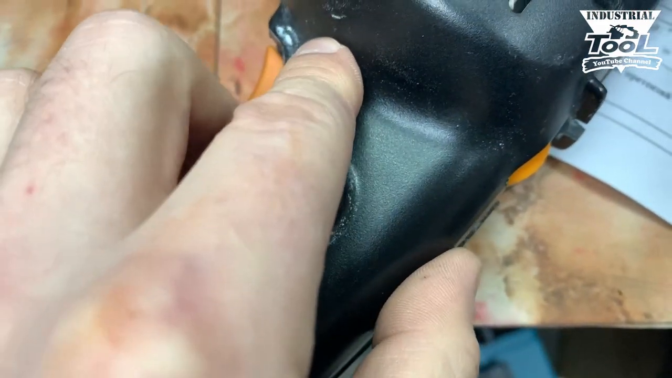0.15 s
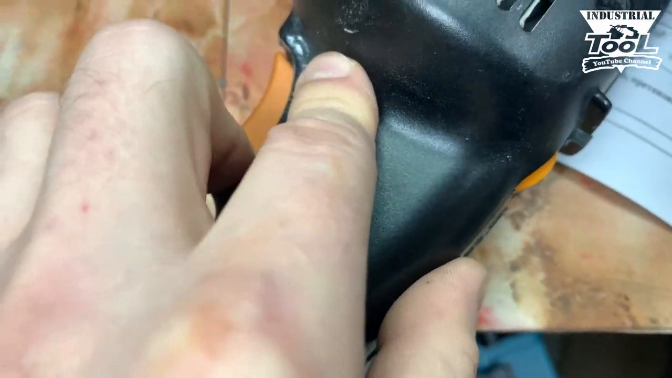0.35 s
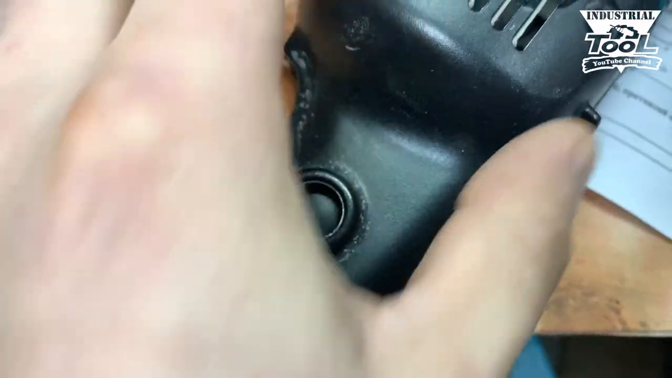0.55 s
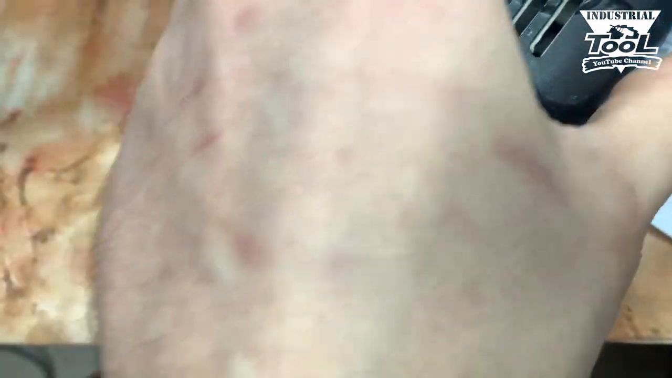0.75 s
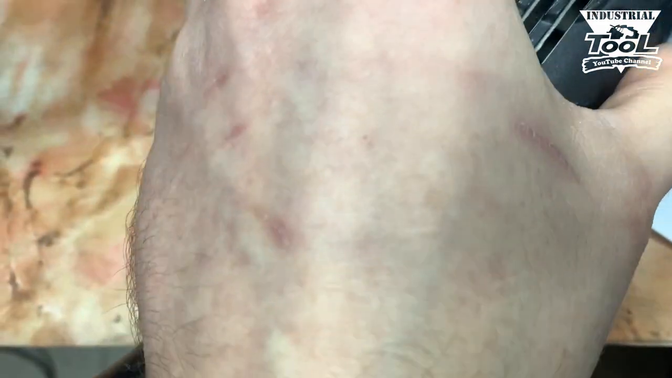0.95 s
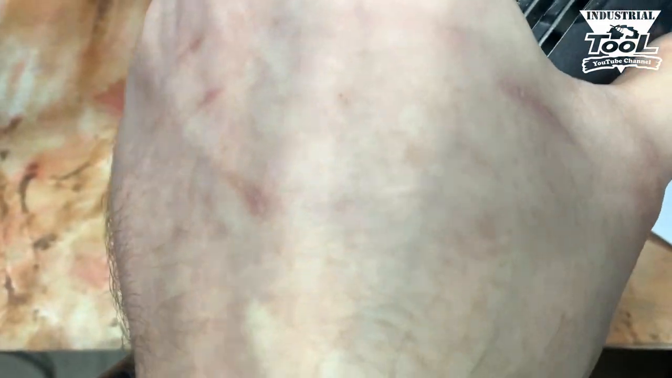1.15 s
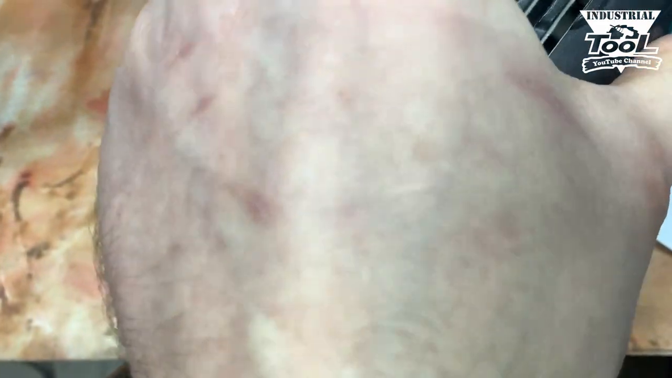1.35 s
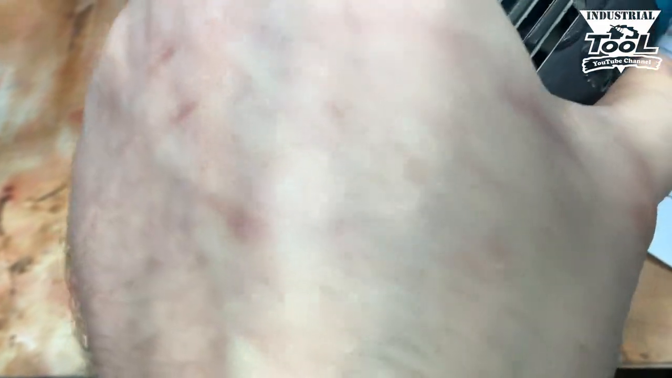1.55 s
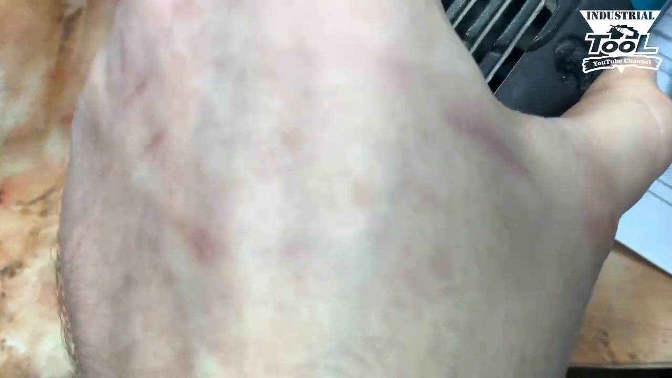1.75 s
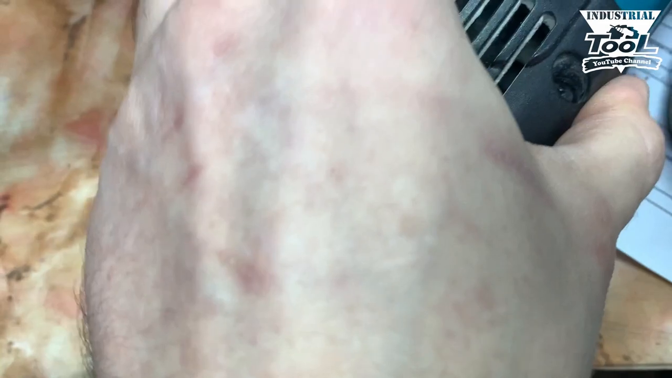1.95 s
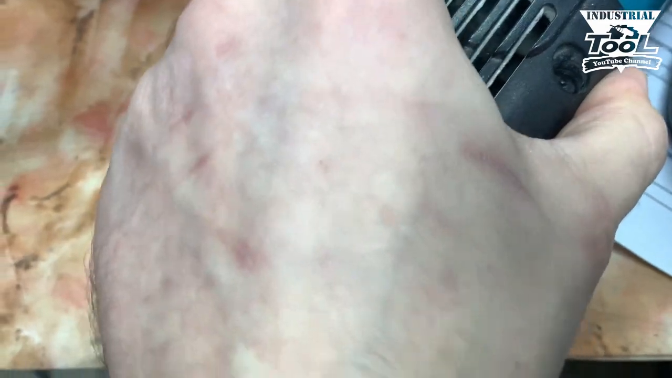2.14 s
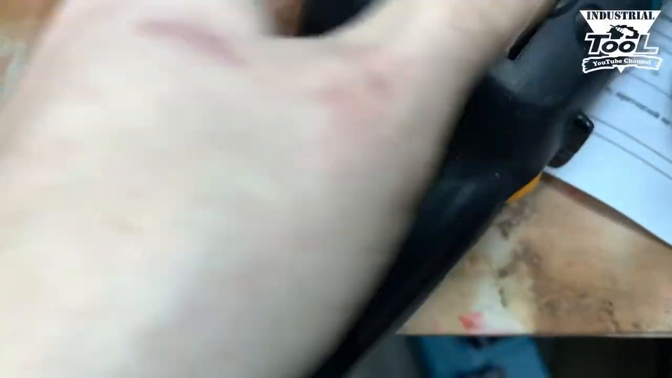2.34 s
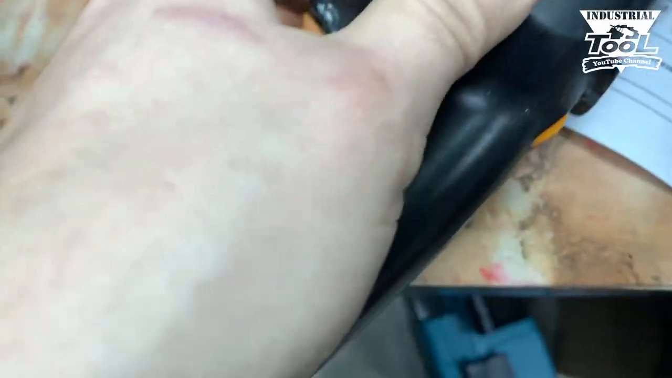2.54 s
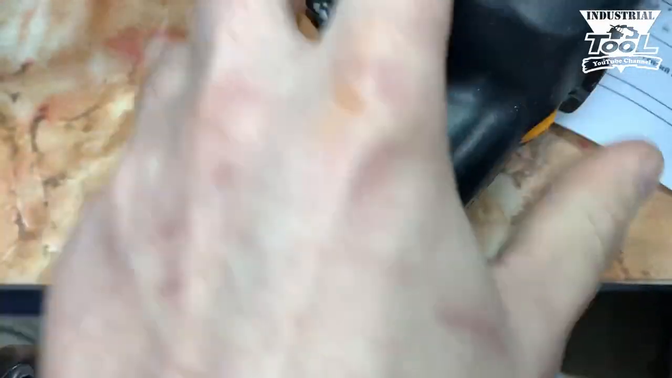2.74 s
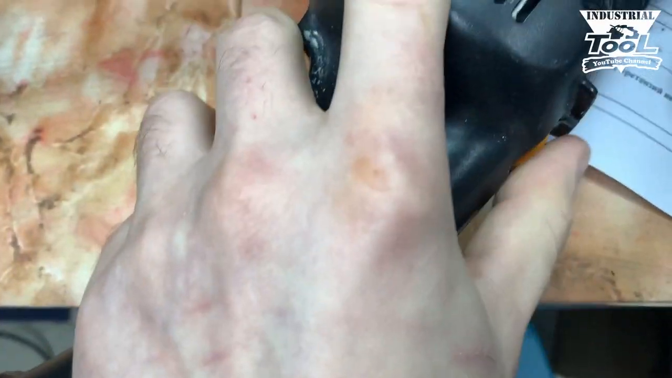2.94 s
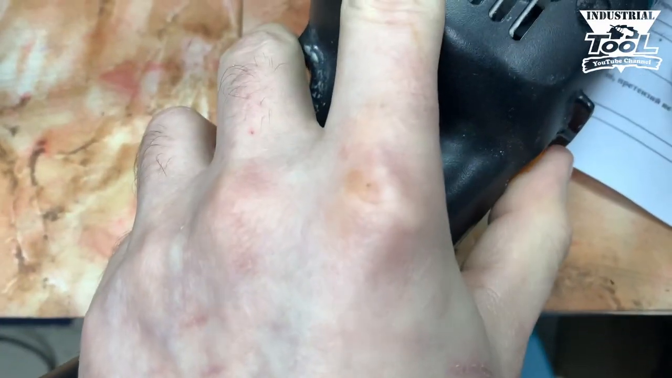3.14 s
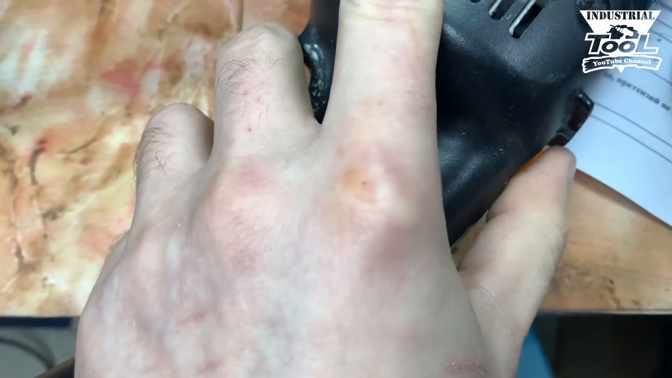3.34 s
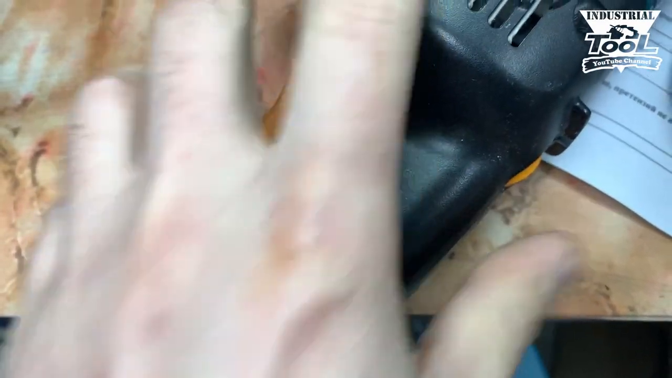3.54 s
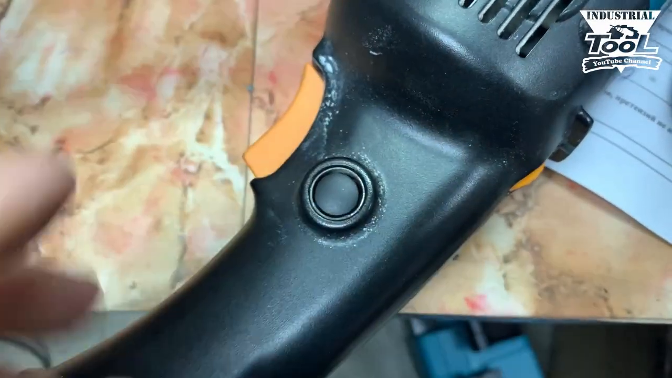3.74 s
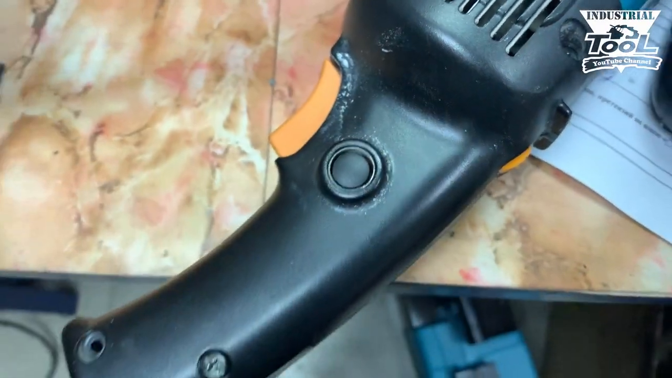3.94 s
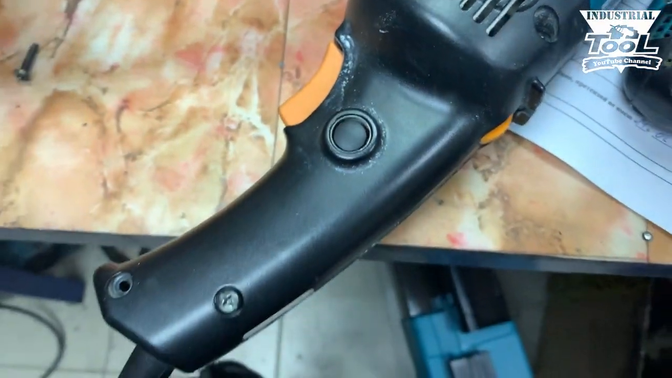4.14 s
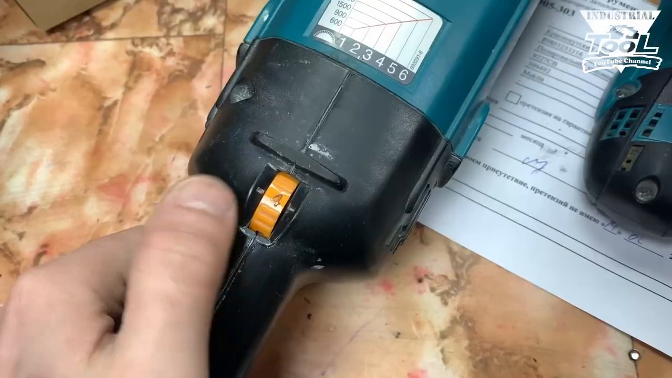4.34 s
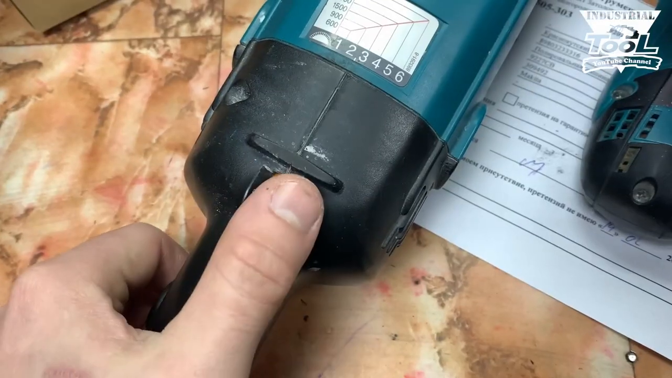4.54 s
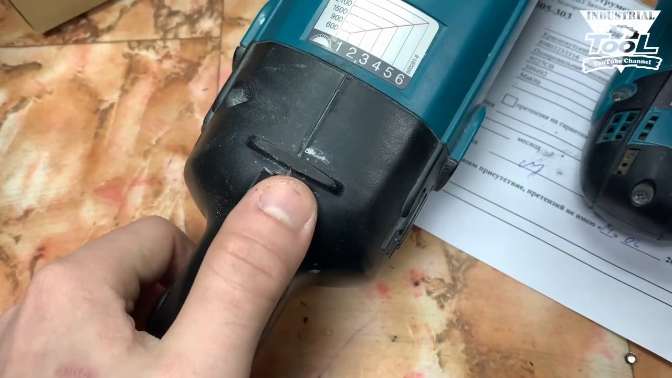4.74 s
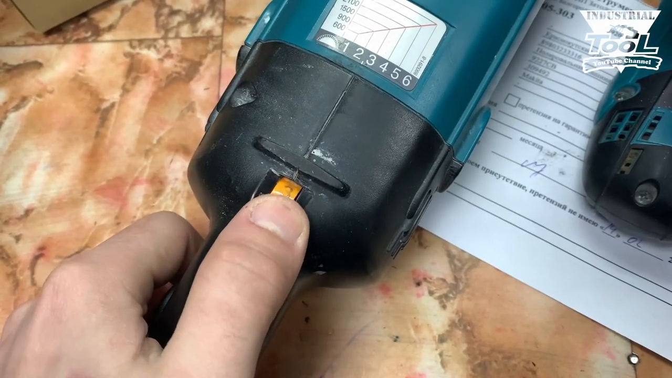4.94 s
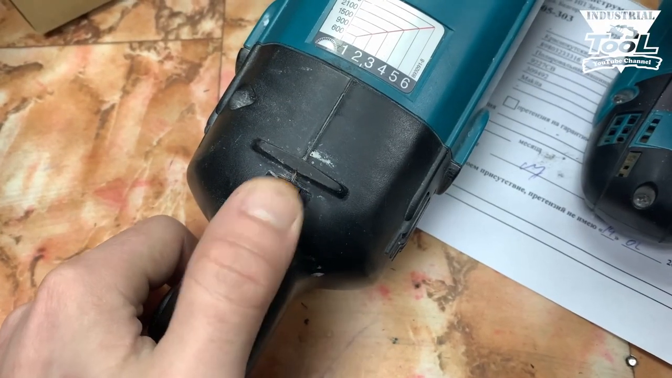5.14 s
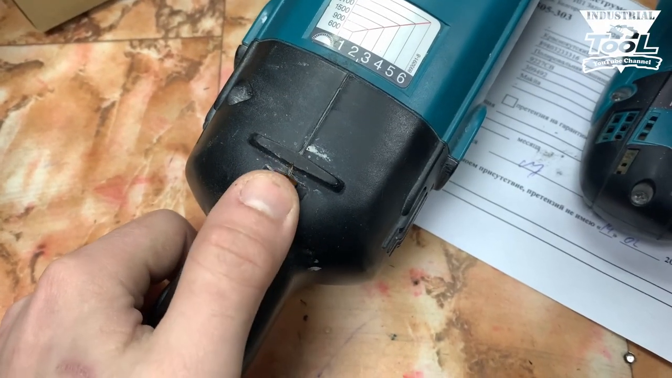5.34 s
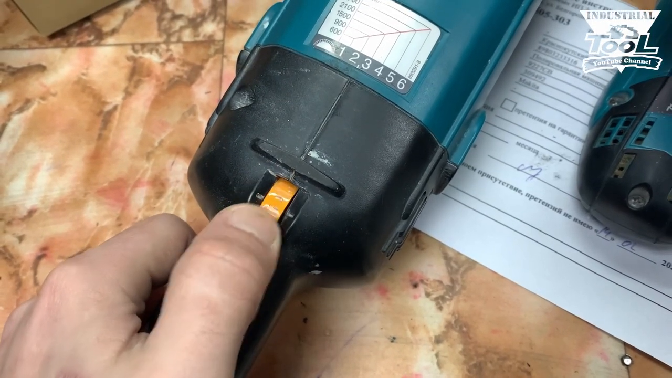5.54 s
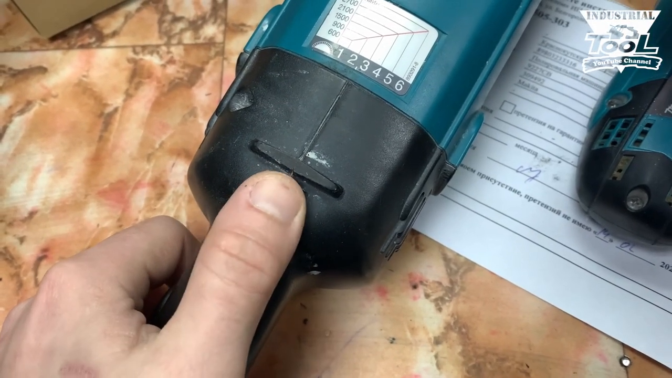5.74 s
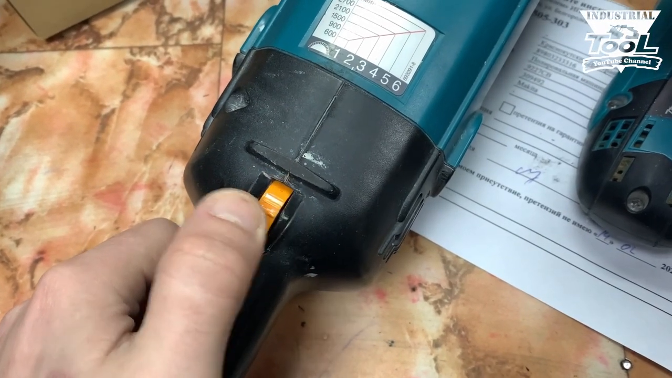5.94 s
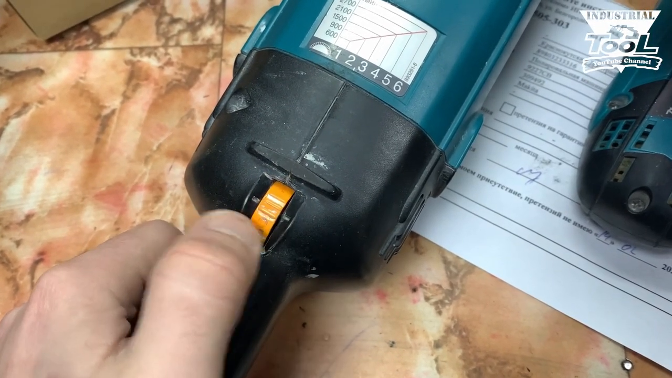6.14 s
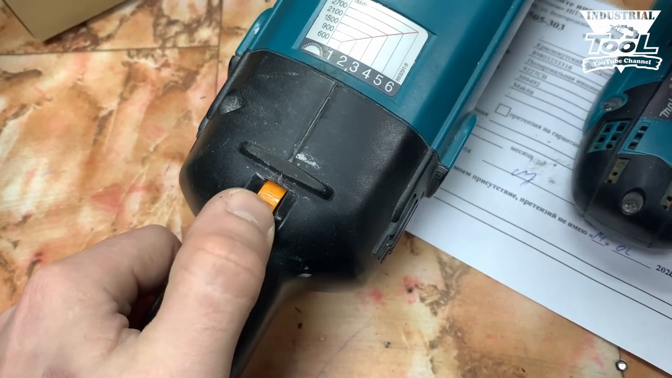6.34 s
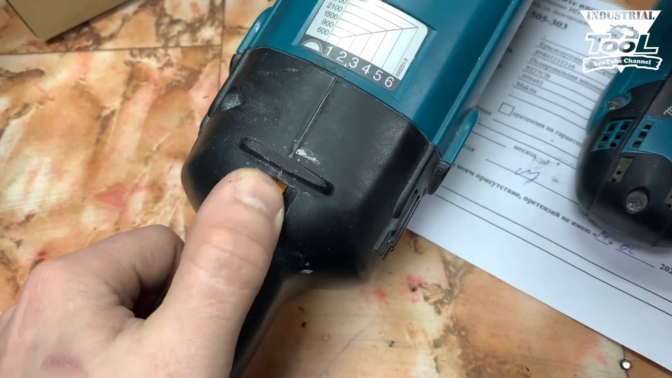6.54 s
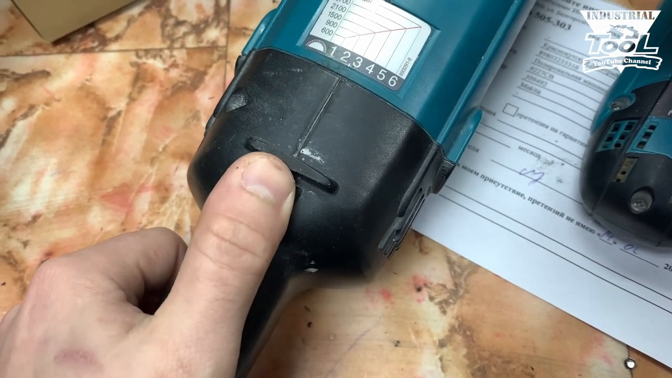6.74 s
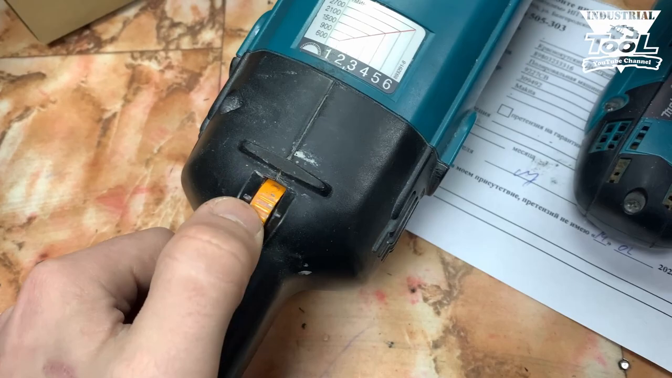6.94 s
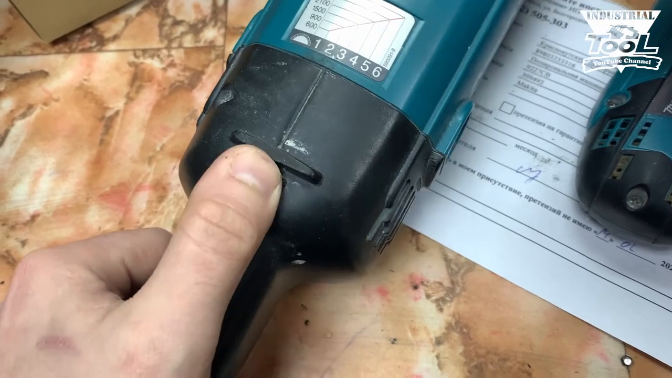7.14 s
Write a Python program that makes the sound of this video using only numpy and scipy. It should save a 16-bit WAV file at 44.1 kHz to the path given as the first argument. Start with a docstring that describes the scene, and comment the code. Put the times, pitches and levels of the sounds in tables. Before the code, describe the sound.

A hand knocks and rubs a plastic power tool on a wooden bench, one hard thud, then a notched dial snaps in bright click clusters.

```python
"""A thumb rolls the notched dial of a plastic power tool: a spring snaps into each notch and rings the housing.
Before that a hand knocks and rubs the tool on a wooden bench, which booms in a few low tones.
Snaps and knocks are noise bursts sent through resonances, plus fading tones; rubbing is noise in strokes.
Behind them lie a quiet workshop's rumble and room tone. A phone is held close;
the sound drops out briefly twice."""
import sys
import numpy as np
from scipy import signal
from scipy.fft import rfft, irfft, next_fast_len
from scipy.io import wavfile
from scipy.ndimage import uniform_filter1d

SR = 44100
rng = np.random.default_rng(int(sys.argv[2]) if len(sys.argv) > 2 else 0)


def waveform_to_disk(signal):
    """Save audio, clipped to [-1, 1], as 16-bit WAV at the path in sys.argv[1]."""
    frames = np.transpose(np.atleast_2d(signal))
    scaled = np.clip(frames, -1, 1) * 32767
    samples = np.round(scaled).astype(np.int16)
    wavfile.write(sys.argv[1], SR, samples)


N = 321048
T = np.arange(N) / SR  # time in seconds

# Resonances of the dial's spring. Each row: pitch in Hz, width in Hz, level in dB.
SPRING = [(5560, 330, -7.5), (7040, 3000, -3.5), (9330, 910, -0.5), (10040, 580, -0.5), (12500, 4100, -4.5),
          (15400, 920, -13)]
# Resonances of the plastic shell. Each row: pitch in Hz, width in Hz, level in dB.
SHELL = [(700, 130, -5), (1027, 110, 1.5), (1510, 350, -4.5), (2350, 360, -1.5)]
# Higher shell resonances, for the edge of hard blows. Each row: pitch in Hz, width in Hz, level in dB.
EDGE = [(3750, 450, 1.5), (4870, 700, -5.5), (5600, 460, -9.5)]

# A "t60" is the time in seconds in which a sound fades by 60 dB.
SNAP_T60_S, RATTLE_T60_S = 0.017, 0.028  # base values for dial snaps and for knocks
CRACK_DB, CRACK_T60_S = 4, 0.0023  # the first contact, its level set against the burst


def dial():
    """Each snap rings spring and housing at once; the hollow grip builds up later."""
    # Spring snaps. Each row: start in seconds, level in dB, treble against middle in dB,
    # hollow knock in dB, wall ring in Hz.
    clicks = [(4.5832, -62, 3.5, -7, 2210), (4.7477, -45, -13, -16.5, 2084), (4.8885, -51, -24, -7, 2295),
              (4.9482, -17.5, 0.5, -20.5, 3140), (4.999, -9.5, -2, -22.5, 2954),
              (5.0501, -16, 2, -19.5, 2955), (5.1333, -35, -24.5, -5, 2350), (5.3979, -11.5, 1, -30, 2710),
              (5.452, -11.5, 3, -33.5, 2617), (5.4975, -11, -2, -28.5, 3720),
              (5.5321, -13.5, 1, -26.5, 2500), (5.6046, -31, -20.5, -5.5, 2400),
              (5.8527, -61.5, -14, 1, 2480), (5.9023, -15.5, -0.5, -29.5, 2710),
              (5.9435, -17.5, 3.5, -29.5, 2570), (5.9829, -26.5, -22, -8.5, 2450),
              (6.2872, -56, -7, -29, 2224), (6.3902, -61, -10.5, -19, 2170),
              (6.4114, -41.5, -19.5, -14, 2900), (6.5787, -51, -20, 0, 2870), (6.5965, -21, 0, -23, 3200),
              (6.638, -19.5, -2, -19, 2690), (6.7191, -18.5, -6, -29, 2770),
              (6.7421, -18.5, 3.5, -36, 3410), (7.067, -41, -5, -19, 2665),
              (7.1135, -21.5, -5.5, -25, 2700), (7.1212, -21.5, 5, -32, 2480),
              (7.1384, -31, -18, -28, 2770), (7.1471, -29.5, 1, -12, 2730), (7.1534, -19, -7, -30.5, 2270),
              (7.1677, -21, 4, -25, 2850), (7.1841, -23.5, -1, -20.5, 2720)]
    # Resonances of the housing. Each row: pitch in Hz, width in Hz, level in dB.
    housing_modes = [(2180, 570, -6), (2790, 420, -7), (3300, 290, -3.5), (4530, 3600, -10),
                     (4990, 530, -6)]
    # Housing panels that ring clearly. Each row: pitch in Hz, level in dB, t60 in seconds.
    plates = [(2550, -8, .02), (3300, -11, .018), (5900, -8, .014)]
    # The hollow grip. Each row: pitch in Hz, level in dB, t60 in seconds, delay in seconds,
    # build-up in seconds.
    hollow_modes = [(620, -3, .04, .005, .004), (1390, -1, .02, .0005, .001)]
    # The grip's looser rattle. Each row: pitch in Hz, width in Hz, level in dB.
    grip_modes = [(500, 350, -6), (620, 190, 1), (1050, 170, -6), (1360, 200, -2), (1750, 240, -9)]

    s, db, treble_db, knock_db, hz = np.transpose(clicks)
    housing = ringing(bursts(s, db - 5.5, SNAP_T60_S, 0.00027, -9.5, 0.11), housing_modes)
    housing = housing + wall(s, db - 0.5, hz, 0.022)
    # the higher the panel, the more it follows the hardness of the snap
    panels = sum(rings(s, db + level + treble_db * (c / 9000) ** 1.5, c, fade, 0.00033)
                 for c, level, fade in plates)
    spring_burst = bursts(s, db + treble_db + 3.0, 1.235 * SNAP_T60_S, 0.00023, -26.5, 0.14)
    spring = ringing(spring_burst, SPRING)
    # so small a part radiates no bass
    bright = filtered(housing + spring, lambda f: (1j * f / (1100 + 1j * f)) ** 2)
    hollow = sum(rings(s + delay, db + knock_db + 9.5 + level, c, fade, rise)
                 for c, level, fade, delay, rise in hollow_modes)
    rattle_burst = bursts(s + 0.0017, db + knock_db + 14.5, 1.3 * SNAP_T60_S, 0.003, -20, 0.12)
    rattle = ringing(rattle_burst, grip_modes)
    return bright + panels + hollow + rattle


def knocks():
    """Blows rattle the shell, thud in the tool's body and, when hard, tick in the treble."""
    # The tool is struck or shifts. Each row: start in seconds, level in dB, body in dB,
    # treble in dB, wall ring in Hz.
    blows = [(0.133, -44.5, -2, -52, 855), (0.23, -39.5, -8, -46, 1370), (0.24, -39, 7, -36, 750),
             (0.253, -20.5, -21, -16.5, 2740), (0.466, -40, -14.5, -46, 2010),
             (1.168, -49.5, -33, -59, 1900), (1.257, -52, -27, -25, 1020), (1.484, -38, -15, -36, 1235),
             (1.499, -42, 8.5, -53, 1220), (1.612, -74.5, 19, -24, 1380), (1.734, -13.5, 1, -27, 797),
             (1.7401, 0, -22, -12.5, 1025), (1.741, -3, -11.5, -20.5, 2292), (2.074, -54.5, -1, -18, 942),
             (2.135, -60.5, 11.5, -36, 860), (2.757, -73.5, -7, -4, 3240), (2.777, -56.5, -7, -4, 2550),
             (2.811, -42, -16.5, -33, 875), (3.035, -57.5, 11, -15, 861), (3.224, -64.5, -6.5, -8.5, 1070),
             (3.359, -48, 0, -52, 640), (3.377, -53.5, -2, -21, 1100), (3.507, -50, -10, -30, 2940),
             (3.53, -43.5, -8, -50, 1011), (4.068, -44, -4.5, -23, 867), (4.135, -36, -14.5, -38.5, 1593)]
    # Resonances of the tool's body. Each row: pitch in Hz, width in Hz, level in dB.
    body_modes = [(204.84, 35, -1.5), (301, 40, -2.5), (435, 51, -6), (580, 70, -5.5)]

    s, db, body_db, treble_db, hz = np.transpose(blows)
    shell = ringing(bursts(s, db - 6.0, RATTLE_T60_S, 0.0014, -18.5, 0.12), SHELL)
    shell = shell + wall(s, db - 6.5, hz, 0.046)
    edge_db = db + 0.45 * treble_db - 0.5
    edge = ringing(bursts(s, edge_db, 0.95 * RATTLE_T60_S, 0.001, -24.5, 0.16), EDGE)
    body = ringing(bursts(s, db + body_db + 9.0, 0.79 * RATTLE_T60_S, 0.0017, -24.5, 0.17), body_modes)
    tick = ringing(bursts(s, db + treble_db + 2.0, 0.7 * RATTLE_T60_S, 0.0024, -26.5, 0.12), SPRING)
    return shell + edge + body + tick


def rubbing():
    """Sliding skin: every stroke swells and fades, a fine hiss over a gritty rustle."""
    # Skin and sleeve slide on plastic, one row a stroke or touch. Each row: start in seconds,
    # length in seconds, hiss in dB, rustle in dB, upper rustle against rustle in dB.
    strokes = [(0, 0.05, -84, -66.5, -24), (0.257, 0.071, -71, -54, -5), (0.286, 0.25, -78, -60.5, -18.5),
               (0.456, 0.032, -57, -68, 8), (0.75, 0.19, -76, -71, -5), (1.146, 0.065, -90, -74, -8),
               (1.248, 0.03, -84, -71, 1), (1.394, 0.15, -79, -55, -17), (1.626, 0.049, -71, -86, 0),
               (1.914, .05, -69, -72.5, -1.5), (2.053, 0.045, -63, -74, -1), (2.151, 0.22, -58, -62.5, 2),
               (2.403, 0.13, -57.5, -61.5, 1), (2.588, 0.16, -57.5, -62.5, 1.5), (2.76, .06, -69, -68, 0),
               (2.833, 0.084, -71, -66.5, -2.5), (2.99, 0.076, -71.5, -69, -0.5),
               (3.202, 0.043, -78, -74, -0.5), (3.34, 0.072, -71, -79.5, -6),
               (3.486, 0.1, -71.5, -71.5, -3), (4.13, .12, -82.5, -63.5, -19),
               (4.568, 0.029, -82.5, -64.5, 1), (4.735, 0.041, -71, -72, 1), (4.777, 0.24, -79.5, -66, -5),
               (5.275, .03, -75, -72.5, -1), (5.761, 0.052, -90, -76.5, -7),
               (5.85, 0.066, -75.5, -60.5, -3.5), (6.212, 0.053, -70, -61.5, -2.5),
               (6.272, 0.11, -71.5, -68, 0.5), (6.402, 0.027, -66, -59.5, 4),
               (6.425, 0.06, -83.5, -67.5, -0.5), (6.553, 0.048, -79, -73.5, 1),
               (6.816, 0.06, -73, -63.5, 1.5), (6.949, 0.051, -73, -67.5, 1.5),
               (7.21, 0.083, -74.5, -67, -0.5)]
    # Colour of the fine hiss. Each row: frequency in Hz, level in dB per Hz.
    hiss_colour = [(4500, -27), (6000, -15), (8700, -3), (11000, -8), (14000, -8.5), (16000, 1.5),
                   (17000, -39)]
    # Colour of the rustle. Each row: frequency in Hz, level in dB per Hz.
    rustle_colour = [(300, -50), (700, -1.5), (1500, 0.5), (2500, 4), (4500, -4.5), (6500, -16),
                     (8000, -36)]
    skew, softness = 1.05, 1.02  # the stroke peaks late above 1; edges are softer the higher
    split_hz = 2600  # where the upper rustle begins
    shell_ring_db = -5.5  # shell-coloured rustle against plain rustle

    hiss, lower, upper = np.zeros((3, N))
    for start, length, hiss_db, rustle_db, upper_db in strokes:
        progress = np.clip((T - start) / length, 0, 1)
        stroke = np.abs(np.sin(np.pi * progress ** skew)) ** softness
        hiss += amp(hiss_db) * stroke
        lower += amp(rustle_db) * stroke
        upper += amp(rustle_db + upper_db) * stroke
    fine = unit(grit(820, 0.31) * noise(hiss_colour, patchy_db=4.5))
    coarse = unit(grit(300, 2) * noise(rustle_colour, patchy_db=1.3))
    shell_ring = unit(ringing(coarse, SHELL + EDGE))
    coarse = unit(coarse + amp(shell_ring_db) * shell_ring)
    dull = filtered(coarse, lambda hz: 1 / (1 + (hz / split_hz) ** 6))
    return hiss * fine + lower * dull + upper * (coarse - dull)


def bench():
    """The top swings in its lowest modes, swelling after the blow."""
    # The bench booms. Each row: start in seconds, level in dB, t60 in seconds.
    booms = [(0.265, -28, 0.16), (0.5, -51, 0.14), (1.3, -49, 0.24), (1.491, -42, 0.26),
             (1.7441, 0.5, 0.13), (1.797, -18.5, 0.24), (1.919, -39.5, 0.19), (2.129, -33.5, 0.15),
             (2.238, -35.5, 0.17), (2.79, -44, 0.11), (3.036, -38, 0.17), (3.88, -46.5, .25),
             (4.139, -42.5, 0.12), (6.599, -42, 0.31), (7.171, -32.5, 0.097)]
    # Lowest modes of the bench top. Each row: pitch in Hz, level in dB.
    bench_modes = [(64, -7), (84, 3), (161, -13)]
    swell_s, swell_s_per_db = 0.024, 0.0004  # swell of a 0 dB boom; weaker ones swell faster

    out = np.zeros(N)
    for s, db, t60 in booms:
        t = np.clip(T - s, 0, 1)
        swell = max(swell_s + swell_s_per_db * db, 0.004)
        # each mode varies by about 1 dB from boom to boom
        swing = sum(amp(level + rng.normal()) * np.sin(2 * np.pi * hz * t) for hz, level in bench_modes)
        envelope = amp(db - 60 * t / t60) * (1 - np.exp(-(t / swell) ** 2))
        out += envelope * swing * (t < 1)
    return out


def workshop():
    """An uneven rumble; the room tone rises and falls a little with it."""
    # Handling and building rumble. Each row: time in seconds, level in dB.
    rumble_levels = [(0.0, -66.5), (0.2, -53), (0.53, -59.5), (0.73, -71.5), (1.2, -64), (1.46, -55.5),
                     (2.2, -57), (2.8, -61.5), (3.18, -68.5), (3.77, -61), (3.95, -53), (4.3, -60),
                     (4.83, -62), (5.1, -60), (5.92, -58), (6.28, -67), (6.7, -55.5), (7.28, -60.5)]
    # Colour of the rumble. Each row: frequency in Hz, level in dB per Hz.
    rumble_colour = [(15, -46), (35, -8.5), (60, -0.5), (100, -9), (150, -17.5), (300, -56.5)]
    # Colour of the room tone. Each row: frequency in Hz, level in dB per Hz.
    air_colour = [(20, -38), (60, -3.5), (150, -5), (230, 4.5), (350, -8.5), (700, -14), (1500, -18.5),
                  (4000, -28), (7000, -31.5), (10000, -28.5), (15000, -34.5), (17000, -41.5)]
    mean_air_db, air_follows = -63.5, 0.25  # dB; dB of room tone for each dB of rumble

    rumble_db = np.interp(T, *np.transpose(rumble_levels))
    air_db = mean_air_db + air_follows * (rumble_db - rumble_db.mean())
    rumble = amp(rumble_db) * noise(rumble_colour, patchy_db=1.0)
    air = amp(air_db) * noise(air_colour, patchy_db=1.58)
    return rumble + air


def bursts(times, levels_db, t60, rise, tail_db, tail_t60):
    """A faint noise swells just before each blow, then a sharp burst, and the room answers weaker and slower."""
    envelope = np.zeros(N + SR)
    t = np.arange(-SR // 30, SR // 3) / SR  # seconds from the blow
    after = np.clip(t, 0, None)
    lead_in = amp(-27.5 + 60 * np.clip(t, None, 0) / 0.036) * (t < 0)
    crack = amp(CRACK_DB - 60 * after / CRACK_T60_S)
    snap = amp(-60 * after / max(t60, 0.003))
    tail = amp(tail_db - 60 * after / tail_t60)
    shape = lead_in + (crack + snap + tail) * (1 - np.exp(-after / rise))
    for s, db in zip(times, levels_db):
        envelope[round((s + t[0]) * SR):][:len(t)] += amp(db) * shape
    return envelope[:N] * rng.standard_normal((2, N))


def wall(times, levels_db, ring_hz, t60):
    """The free part of the plastic wall rings at a pitch set by the grip."""
    return rings(times, levels_db, ring_hz, t60, rise=0.0009)


def rings(times, levels_db, ring_hz, t60, rise):
    """One damped tone a blow, with new phase and slightly new strength each time."""
    out = np.zeros((2, N + SR))
    t = T[:SR // 10]
    for s, db, hz in np.broadcast(times, levels_db, ring_hz):
        phase = rng.uniform(0, 2 * np.pi, (2, 1))  # one for each row
        chance_db = rng.normal(0, 3.7)
        envelope = amp(db + chance_db - 60 * t / t60) * (1 - np.exp(-t / rise))
        out[:, round(s * SR):][:, :len(t)] += envelope * np.sin(2 * np.pi * hz * t + phase)
    return out[:, :N]


def grit(rate, spread_db):
    """Skin catches and slips: a gain that jumps rate times a second."""
    steps = rng.exponential(size=int(N * rate / SR) + 2)
    return unit(amp(spread_db * steps[(T * rate).astype(int)]))


def noise(spectrum, patchy_db):
    """Two unrelated noises, of rms 1 together, with shared patches of random gain."""
    z = signal.stft(rng.standard_normal((2, N)), nperseg=512)[2]
    # smooth the random gains over 6 frequency steps, then over 8 time steps
    field = uniform_filter1d(rng.standard_normal(z.shape[1:]), size=6, axis=0)
    field = uniform_filter1d(field, size=8, axis=1)
    pair = signal.istft(z * amp(patchy_db * unit(field)), nperseg=512)[1][:, :N]
    return unit(filtered(pair, lambda hz: amp(along(spectrum, hz))))


def ringing(x, modes):
    """Send x through resonances, scaled so that white noise keeps its power."""
    def gain(f):
        total = 0
        for k, (c, w, db) in enumerate(modes):
            resonance = 1j * f * w / (c * c - f * f + 1j * f * w)
            total = total + (-1) ** k * amp(db) * resonance  # neighbours have opposite signs
        return total

    def response(f):
        g = gain(f)
        return g / np.sqrt(np.mean(np.abs(g) ** 2))
    return filtered(x, response)


def filtered(x, response):
    """Multiply the spectrum of x by a complex response of frequency."""
    m = next_fast_len(N + 8192)
    return irfft(rfft(x, m) * response(np.fft.rfftfreq(m, 1 / SR)), m)[..., :N]


def along(points, hz):
    """Read a curve of (Hz, value) points on a logarithmic frequency axis."""
    f, v = np.transpose(points)
    return np.interp(np.log(hz + 1), np.log(f + 1), v)


def amp(db):
    """Turn decibels into an amplitude factor."""
    return 10 ** (np.asarray(db) / 20)


def unit(x):
    """Scale x to an rms (average strength) of 1."""
    return x / np.sqrt(np.mean(x ** 2) + 1e-20)


def scene():
    """Add all sources: row 0 is what both sides share, row 1 what sets them apart."""
    return dial() + knocks() + rubbing() + workshop() + bench() * [[1], [0]]  # bench in row 0 only


def record(dry):
    """The phone's stereo: each side is row 0 plus or minus row 1; it clips softly. The sound also drops out
    briefly twice."""
    # How alike left and right are when both rows are equally strong. Each row: frequency in Hz,
    # likeness from 0 to 1.
    alike = [(40, 1), (200, 0.9), (600, 0.5), (1100, 0.2), (1700, 0.34), (2400, 0.39), (3300, .25),
             (5000, 0.081), (5900, 0.47), (7000, 0.96)]
    # Balance of the two sides. Each row: frequency in Hz, left minus right in dB.
    lean = [(500, 0.5), (1100, 1.5), (2300, 1.5), (5000, -3), (6500, 0)]
    # Dropouts. Each row: start in seconds, end in seconds, level in dB.
    dropouts = [(4.24, 4.289, -33.5), (6.31, 6.334, -21.5)]
    lead, lag = 13 / 44100, 9.5 / 44100  # s: left middle range comes early, left treble late
    top_hz = 16700  # almost nothing passes above this

    def side(sign):
        def response(hz):
            turn = np.arccos(np.clip(along(alike, hz), 0, 1)) / 2
            delay = np.interp(hz, [400, 1500, 3000, 5000], [0, -lead, -lead, lag])
            late = np.exp(-1j * np.pi * sign * hz * delay)  # half the delay on each side
            bass_loss = (1j * hz / (30 + 1j * hz)) ** 2  # the small microphones lose the deepest bass
            mix = [np.cos(turn), sign * np.sin(turn)]
            return amp(sign * along(lean, hz) / 2) * late * bass_loss * mix
        return filtered(dry, response).sum(axis=0)

    x = np.array([side(1), side(-1)])  # left, right
    x = x / (1 + np.abs(x) ** 12) ** (1 / 12)  # soft clipping
    gain = np.ones(N)
    for start, end, db in dropouts:
        gain[(T > start) & (T < end)] = amp(db)
    x = x * uniform_filter1d(gain, size=60)
    return np.clip(filtered(x, lambda hz: 1 / (1 + (hz / top_hz) ** 80)), -1, 1)


dry = scene()
out = record(dry)
waveform_to_disk(out)
```